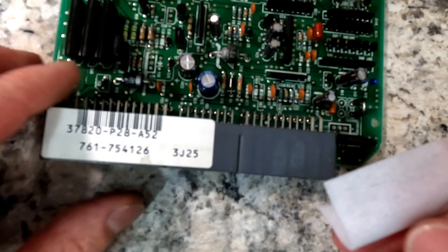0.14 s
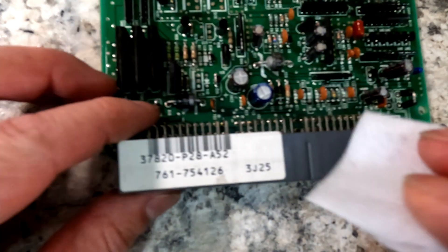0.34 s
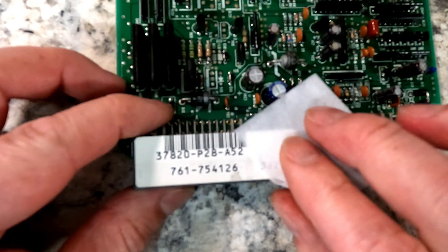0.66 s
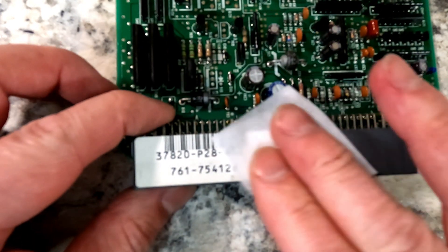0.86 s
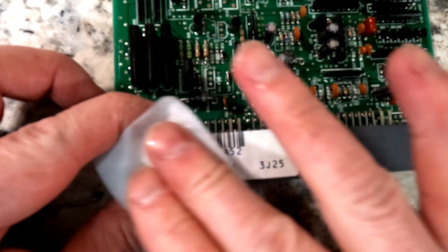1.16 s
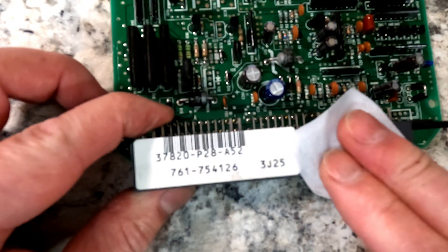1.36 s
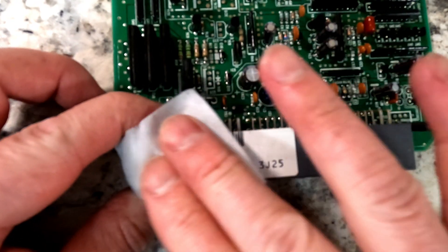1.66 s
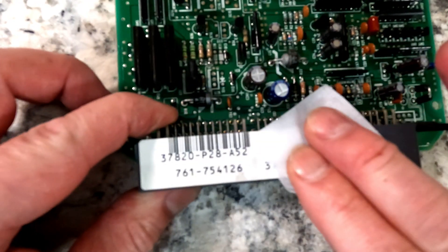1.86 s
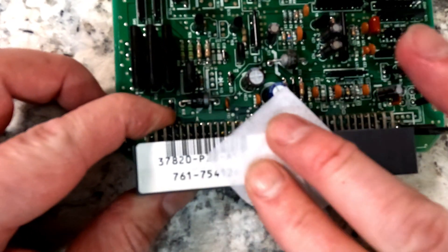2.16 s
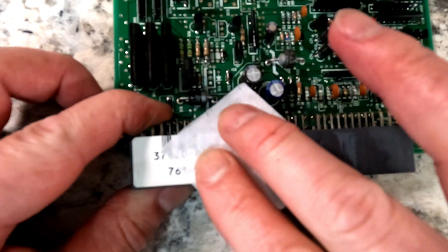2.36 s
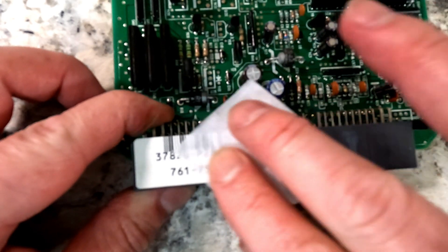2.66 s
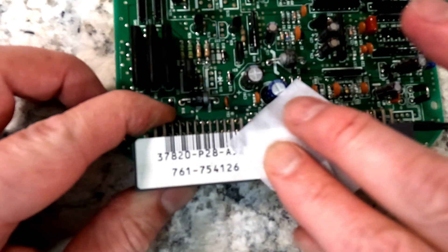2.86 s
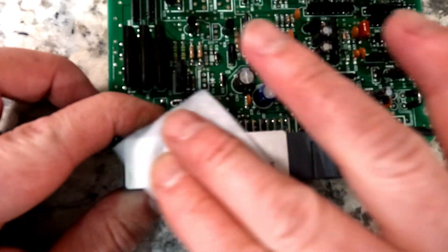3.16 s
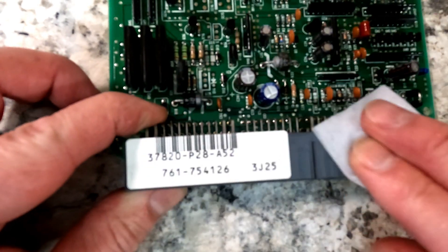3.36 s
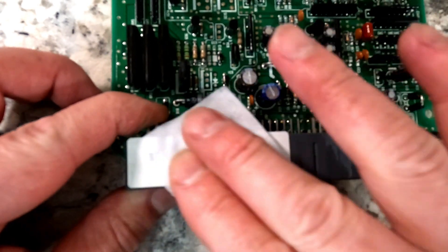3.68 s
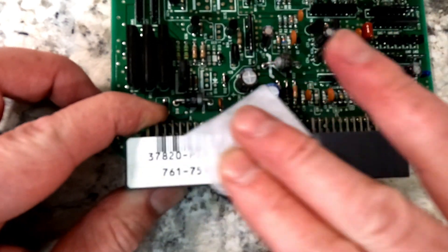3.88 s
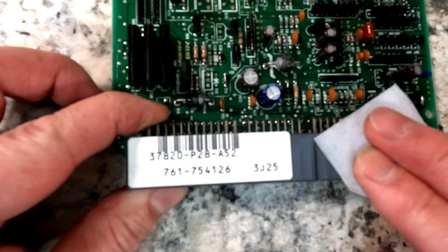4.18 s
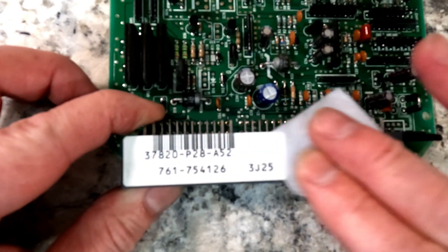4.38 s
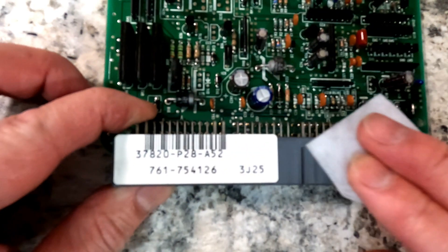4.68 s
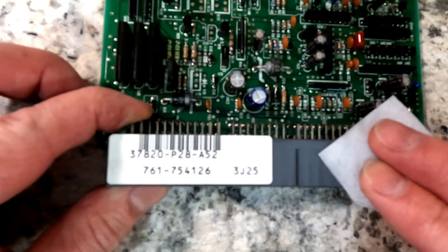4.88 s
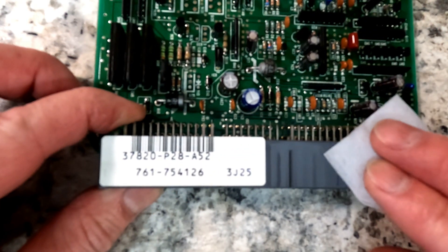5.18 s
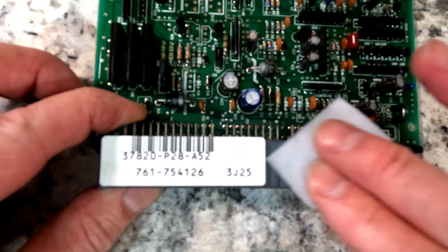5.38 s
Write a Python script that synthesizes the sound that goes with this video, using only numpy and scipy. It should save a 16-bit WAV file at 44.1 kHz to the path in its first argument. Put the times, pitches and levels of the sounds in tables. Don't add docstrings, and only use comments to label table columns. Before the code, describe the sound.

A close, quiet indoor take with faint low room rumble and a thin hiss. From 0 to 1 s fingers settle a cloth pad on a circuit board: a dry crackle near 0.1 s, small skids around 0.5 s, tiny creaks and ticks. From 1 s the pad wipes in short, soft, airy strokes, roughly four a second, each with a slight hollow board hum and light ticks. At 2.55 s the board rocks and drops onto the stone counter: by far the loudest moment, a hard bright clack with a deep thud, repeated more weakly at 2.62 and 2.67 s, rattling out by 2.8 s. Lighter strokes resume about 3 s, with a dull low bump at 3.2 s and faint skin squeaks around 3.6 to 3.7 s. At 4.65 s smaller knocks come, then a low counter heave near 4.86 s. Sparse faint dabs follow, ending with a slight tick about 5.5 s.

```python
import sys
import numpy as np
from scipy import signal
from scipy.fft import rfft, irfft, next_fast_len
from scipy.io import wavfile
from scipy.ndimage import uniform_filter1d

SR = 44100
rng = np.random.default_rng(int(sys.argv[2]) if len(sys.argv) > 2 else 0)


def voltage_ratio(decibels):
    exponent = np.asarray(decibels, float) / 20
    return 10 ** exponent


def to_wav(sig):
    pcm = np.clip(np.atleast_2d(sig), -1, 1) * 32767
    pcm = np.round(pcm).astype(np.int16)
    wavfile.write(sys.argv[1], SR, pcm.T)


N = 243873
OPPOSITE = np.array([[1], [-1]])


def rms_one(x):
    return x / np.sqrt(np.mean(x ** 2) + 1e-20)


def lowpass(x, hz, order=2):
    return signal.sosfilt(signal.butter(order, hz, fs=SR, output="sos"), x)


def bandpass(x, low_hz, high_hz, order=2):
    return signal.sosfilt(signal.butter(order, [low_hz, high_hz], "band", fs=SR, output="sos"), x)


def lean_left(db):
    return voltage_ratio([[db / 2], [-db / 2]])


def in_time(rows):
    s, *columns = np.transpose(rows)
    return [np.interp(np.arange(N) / SR, s, c) for c in columns]


def at_hz(points, hz):
    point_hz, value = np.transpose(points)
    return np.interp(np.log(hz), np.log(point_hz), value)


def drift(rate_hz):
    r = np.exp(-80 * np.pi * rate_hz / SR)
    slow = signal.lfilter([1], [1, -2 * r, r * r], rng.standard_normal(N // 40 + 2002))[2000:]
    return np.interp(np.arange(N) / 40, np.arange(len(slow)), rms_one(slow))


def ring(drive, hz, t60_s):
    r = voltage_ratio(-60 / (max(t60_s, .001) * SR))
    w = 2 * np.pi * hz / SR
    return signal.lfilter([0, np.sin(w)], [1, -2 * r * np.cos(w), r * r], drive + 1e-18)


def grains(spread_db):
    size = voltage_ratio(spread_db * np.minimum(rng.exponential(1, N), 5))
    return rms_one(rng.standard_normal((2, 2, N)) * size)


# (frequency [Hz], left-right likeness [-1..1])
ALIKE = [(30, 0.96), (300, 0.94), (1500, 0.73), (4000, 0.96), (8000, 0.47), (13000, 0.5)]
# (frequency [Hz], left minus right [dB])
LEAN = [(30, 2), (300, 0), (2000, -0.5), (5000, 1), (12000, -2.5)]


def banded(spectrum, patchy_db, white, first=0, last=19, slowing_db=0, bright_db=0):
    out, steady, together = 0, 0, drift(0.86)
    edges = (26 * 2 ** np.arange(0, 9.6, .5))[first:last + 1]
    for k, (low, high) in enumerate(zip(edges, edges[1:])):
        mid, side = bandpass(white[k % 2], low, high)
        hz = np.sqrt(low * high)
        alike = np.clip(at_hz(ALIKE, hz), -1, 1)
        gain = voltage_ratio(at_hz(spectrum, hz) + patchy_db * (together / 2 + drift(11.2)))
        pair = np.sqrt(1 + alike) * mid + np.sqrt(1 - alike) * side * OPPOSITE
        pair = gain * pair * lean_left(at_hz(LEAN, hz))
        steady += np.mean(pair ** 2)
        out = out + pair * voltage_ratio(slowing_db * (hz / 6500) ** 0.36 + bright_db * np.log2(hz / 6500))
    return out / np.sqrt(steady)


def burst(at_s, t60_s, draw):
    fall = voltage_ratio(-60 * np.arange(len(draw)) / SR / np.clip(t60_s, .003, .2))
    return round(at_s * SR), np.r_[1, .3 * (draw * fall)[1:]]


def add(track, start, x):
    track[start:start + len(x)] += x[:N - start]


def slips(swells, resonances):
    t, noise = np.arange(N) / SR, grains(spread_db=2.0)[0, 0]
    swell = sum(voltage_ratio(db) * np.exp(-((t - s) / (length / 2)) ** 2) for s, length, db in swells)
    sung = sum(voltage_ratio(db) * rms_one(ring(noise, hz, 3.25 / width)) for hz, width, db in resonances)
    return swell * lowpass(sung, 6500)


# (frequency [Hz], density [dB per Hz])
ROOM_TONE = [(24, -25), (40, -0.5), (54, -17), (123, -11.5), (245, -10.5), (268, -42), (371, -5),
             (417, -30), (514, -25), (900, -66), (1170, -87.5), (1980, -120)]


def room_tone():
    return voltage_ratio(-50.5) * banded(ROOM_TONE, 0.6, grains(spread_db=0.0), first=1, last=11)


# (frequency [Hz], density [dB per Hz])
AIR = [(470, -58), (800, -21.5), (1070, -13), (1160, 1), (1470, -6.5), (3890, -20), (7500, -22.5),
       (14000, -62)]


def hiss_floor():
    return voltage_ratio(-71.5) * banded(AIR, 0.53, grains(spread_db=-6.0), first=9)


KITCHEN_T60_S, KITCHEN_DB, WALL_CUT_HZ = 0.17, -18.5, 9000


def kitchen(x):
    size = next_fast_len(N + SR)
    angle = -2j * np.pi * np.arange(size // 2 + 1) / size
    pole = np.exp(-2 * np.pi * WALL_CUT_HZ / SR)
    dull = (1 - pole) / (1 - pole * np.exp(angle))
    out = np.zeros((2, len(angle)), complex)
    for k, lag in enumerate(rng.integers(300, 1500, 16)):
        loop = voltage_ratio(-60 * lag / SR / KITCHEN_T60_S) * dull * np.exp(angle * lag)
        out[k % 2] += loop / (1 - loop) * (-1) ** (k // 2)
    return voltage_ratio(KITCHEN_DB) * irfft(out * rfft(x, size), size)[:, :N]


# (time [s], drag on the stone [dB], sway of hands and counter [dB])
HANDS = [(0.0, -48.5, -47), (.15, -52, -41.5), (.45, -63, -44), (.59, -42.5, -53), (.76, -53, -40),
         (1.42, -52.5, -39.5), (1.7, -49, -38), (2.2, -55.5, -39.5), (2.5, -43, -37.5), (2.95, -58, -49.5),
         (3.16, -49.5, -33), (3.55, -56, -50.5), (4.05, -53, -55), (4.25, -53, -37.5), (4.5, -49, -39),
         (4.63, -49.5, -50), (5.12, -49.5, -37.5), (5.53, -53.5, -55)]
# (frequency [Hz], density [dB per Hz])
DRAG = [(29, -30), (50, 4), (76, -17.5), (107, -9), (173, -13), (227, -6.5), (649, -20), (733, -26.5),
        (864, -35.5), (1300, -20), (1690, -47), (2860, -120)]


def handling():
    drag_db, sway_db = in_time(HANDS)
    drag = voltage_ratio(drag_db - 0.5) * banded(DRAG, 2.15, grains(spread_db=2.5), first=2, last=13)
    sway_spectrum = [(30, 16.5), (45, -15.5), (64, -13.5), (90, -24.0)]   # (Hz, dB per Hz)
    sway = voltage_ratio(sway_db - 3.0) * banded(sway_spectrum, 0.8, grains(spread_db=2.0), last=4)
    return drag + sway


# (frequency [Hz], level [dB], t60 [s], left minus right [dB])
COUNTER = [(69, 1, 0.46, -1), (107.6, 12, 0.12, 1), (143.9, -0.5, 0.35, 6), (193, -7, 0.28, 4),
           (219, -16, 0.3, 20.5)]
# (time [s], peak [dB])
THUDS = [
    (2.481, -26),
    (2.55, -5),
    (2.672, -15.5),
    (3.179, -9),
    (3.213, -21),
    (4.849, -9.5),
    (5.089, -38),
]
# (time [s], peak [dB])
REBOUNDS = [
    (4.871, -10.5),
    (4.885, -12),
]
# (time [s], level [dB], t60 [s])
SWAYS = [
    (2.556, -42, 0.25),
    (3.199, -32, 0.14),
    (3.23, -16.5, 0.28),
    (4.863, -18, 0.69),
]
SWAY_HZ, SWAY_LEFT_DB, SLAB_LAG_S = 23.24, 7.5, .003


def thuds():
    push, sway = np.zeros((2, N))
    for s, db in THUDS:
        push[round((s + SLAB_LAG_S) * SR)] = voltage_ratio(db - 18.0)
    for s, db in REBOUNDS:
        push[round((s + SLAB_LAG_S) * SR)] = -voltage_ratio(db - 21.5)
    for s, db, t60 in SWAYS:
        add(sway, round(s * SR), -voltage_ratio(db) * ring(np.arange(SR) == 0, SWAY_HZ, t60))
    out = sway * lean_left(SWAY_LEFT_DB)
    for hz, db, t60, left_db in COUNTER:
        out = out - voltage_ratio(db) * ring(push, hz, t60) * lean_left(left_db)
    return lowpass(out, 300, order=3)


# (time [s], length [s], level [dB])
SCRAPES = [
    (.45, 0.046, -38.5),
    (.482, 0.046, -31),
    (.54, 0.051, -40.5),
    (.77, 0.048, -72),
    (1.06, 0.05, -46.5),
    (2.138, 0.065, -42),
    (2.74, 0.19, -41),
    (3.49, 0.035, -43.5),
    (4.86, 0.036, -38),
    (4.93, 0.058, -45),
]
# (frequency [Hz], width [Hz], level [dB])
SCRAPE = [(300, 65, -1.5), (727, 88, -9.5), (1050, 360, -14.5), (1450, 230, -13), (1900, 570, -20),
          (2740, 2100, -14)]


def scrapes():
    return slips(SCRAPES, SCRAPE)


# (time [s], length [s], level [dB])
SQUEAKS = [
    (3.586, 0.044, -55),
    (3.73, 0.039, -47.5),
    (4.124, 0.032, -83),
    (5.138, 0.04, -62),
]
# (frequency [Hz], width [Hz], level [dB])
SQUEAK = [(768, 110, 7), (2980, 150, -1), (5840, 100, 0)]


def squeaks():
    return slips(SQUEAKS, SQUEAK)


# (time [s], length [s], level [dB], frequency [Hz], width [Hz])
CREAKS = [(.406, 0.013, -70, 1450, 300), (.537, 0.011, -47.5, 3650, 400), (0.586, 0.046, -49.5, 1550, 150),
          (0.637, 0.058, -56, 1560, 149), (.69, 0.05, -59, 2980, 119), (0.723, 0.063, -50, 1510, 130),
          (.782, 0.03, -49.5, 1450, 150), (0.819, .02, -52, 1450, 150), (0.88, 0.009, -56, 3700, 300),
          (0.919, 0.022, -49, 1450, 128), (0.923, 0.014, -58, 3700, 300), (.58, 0.16, -46.5, 304, 150),
          (2.128, 0.11, -48, 517, 201), (2.135, 0.072, -51, 925, 150), (2.677, 0.046, -30, 900, 152),
          (2.783, 0.079, -40.5, 450, 59.7), (2.86, 0.08, -46, 199, 39.3), (3.186, 0.023, -49.5, 960, 200),
          (3.485, 0.045, -47.5, 430, 80.7), (4.777, 0.082, -49.5, 1384, 58.5),
          (4.853, 0.014, -42.5, 960, 200), (4.913, 0.018, -50, 1020, 120), (4.918, 0.021, -56, 810, 120),
          (4.959, 0.094, -51, 840, 100), (5.204, 0.063, -57.5, 1554, 101), (0.448, 0.02, -35, 310, 80),
          (0.474, 0.096, -49, 726, 80), (0.799, 0.064, -44.5, 108, 40), (1.11, 0.043, -41.5, 107, 40),
          (4.456, 0.09, -50.5, 116, 40), (4.192, 0.033, -55.5, 5580, 100), (4.829, 0.035, -52.5, 5800, 250),
          (5.343, 0.028, -60.5, 5630, 120.6), (5.327, 0.28, -61.5, 1410, 80), (4.66, 0.011, -34, 2000, 900),
          (4.704, 0.036, -38, 1950, 900), (4.742, 0.03, -43, 1600, 300)]


def creaks():
    out, t = np.zeros(N), np.arange(-4000, 4000) / SR
    for (s, length, db, hz, width), draw in zip(CREAKS, rng.standard_normal((len(CREAKS), len(t)))):
        sung = rms_one(ring(ring(draw, hz, 1.9 / width), hz, 1.9 / width))
        add(out, round((s + t[0]) * SR), voltage_ratio(db) * np.exp(-(2 * t / length) ** 2) * sung)
    return out * lean_left(1.0)


# (time [s], peak [dB], low edge [Hz])
PRICKS = [(0.0782, -24, 2500), (0.0855, -44, 1200), (0.114, -50, 5000), (0.1335, -41, 3500),
          (0.778, -46, 6000), (0.915, -55, 7000), (1.6112, -46, 1200), (2.1056, -42, 900),
          (2.5508, -18, 3500), (2.6238, -28, 3000), (2.6724, -20, 4500), (2.682, -28, 3960),
          (2.7152, -37, 1500), (2.7497, -42, 1300), (2.7858, -52, 1310), (3.4702, -43, 900),
          (4.7352, -30, 3500), (4.7368, -40, 5000), (5.02, -48.5, 4000), (5.513, -46, 1500)]
PRICK_T60_S, PRICK_TOP_HZ = 0.0045, 14000


def pricks():
    out = np.zeros(N)
    for (s, db, low_hz), draw in zip(PRICKS, rng.standard_normal((len(PRICKS), 400))):
        start, force = burst(s, PRICK_T60_S, draw)
        add(out, start, voltage_ratio(db) * bandpass(force, low_hz, PRICK_TOP_HZ))
    return out


# (time [s], peak [dB], frequency [Hz], brightness above peak [dB])
SNAPS = [(0.0782, -24, 4300, -29), (0.089, -31, 4300, -15), (0.11, -60, 1200, -19), (0.131, -39, 3740, -18),
         (0.271, -59, 6000, -15), (0.758, -46, 10100, -8), (0.777, -52, 1450, -12), (0.915, -70, 3760, -10),
         (0.8173, -58, 1480, -23), (3.181, -40, 1750, -25), (4.7273, -24, 1500, -30),
         (4.7352, -27.5, 5000, -7), (4.8537, -37, 915, -28), (5.02, -49, 1420, -12),
         (4.393, -49, 5030, -13.5), (5.147, -38, 4700, -12)]


def snaps():
    out = np.zeros(N)
    for (s, db, hz, bright_db), draw in zip(SNAPS, rng.standard_normal((len(SNAPS), 900))):
        start, force = burst(s, 0.018, draw)
        edge = voltage_ratio(bright_db - 16.0) * np.diff(force, prepend=0)
        add(out, start, voltage_ratio(db - 4.5) * (ring(force, hz, 4.7 / hz) + edge))
    return out


# (time [s], peak [dB], frequency [Hz], length [cycles])
BOUNCES = [(2.5501, -1.5, 1450, 4.5), (2.5509, 2, 2950, 10), (2.5554, 2, 3000, 9.6),
           (2.5598, -8, 3100, 6.0), (2.5635, -3, 2860, 6.5), (2.598, -18, 1500, 9.9),
           (2.623, -5.5, 1420, 7), (2.6243, -11, 2980, 7.1), (2.677, -8.5, 1520, 9.7),
           (2.6832, -7, 2930, 11), (2.691, -23, 3720, 8.3), (2.716, -16, 2690, 5.3),
           (2.721, -15, 1800, 9.3), (2.7517, -12, 1900, 3.7), (4.6532, -11.5, 2570, 5.8),
           (4.693, -17, 2500, 4.3), (4.703, -14, 2500, 3.0), (4.71, -36, 2700, 5.0),
           (4.7278, -25, 1450, 32), (4.7315, -29, 1450, 18.0), (0.0783, -48, 3500, 3.0),
           (3.182, -40, 1840, 62), (3.473, -31, 1540, 30.0), (4.66, -22, 1800, 5.0),
           (4.664, -25, 2600, 4.0), (4.6975, -31, 1800, 5.0), (4.7155, -39, 2500, 3.0),
           (2.5673, -16, 1500, 8.0), (2.572, -21, 1600, 8.0), (2.629, -16, 1500, 8.0),
           (2.637, -17, 2000, 6.0), (2.688, -24, 1530, 9.0), (1.611, -42, 1500, 6.0),
           (2.474, -35, 1100, 8.1)]


def bounces():
    out = np.zeros(N)
    for s, db, hz, cycles in BOUNCES:
        add(out, round(s * SR), -voltage_ratio(db) * ring(np.arange(2000) == 0, hz, cycles / hz))
    return bandpass(out, 1000, 4200, order=4)


# (time [s], peak [dB], flap above peak [dB], hardness above peak [dB], rattle t60 [s])
DROPS = [(2.1056, -30, -1, -34, 0.044), (2.1246, -33.5, -21, -21, 0.046), (2.5507, -2, -9, 0.5, 0.044),
         (2.5554, -20, -17, -24, 0.066), (2.5618, -25.5, 5, -29.5, 0.029), (2.6229, -11, -11, 0, 0.13),
         (2.6728, -10, -13.5, -2, 0.11), (2.683, -16, -10, -18, 0.1), (2.7152, -23, -6.5, -10, 0.21),
         (2.7495, -23.5, 0, -28, 0.046), (2.7855, -33, -4, -33, 0.05), (3.4698, -33.5, -8.5, -28.5, 0.1),
         (4.6533, -27, -0.5, -30, 0.17), (4.6922, -29, 1, -26, 0.08), (4.7037, -37, 7, -34, 0.12),
         (4.7285, -43.5, 9, -34, 0.2)]
# (time [s], peak [dB])
TICKS = [(0.4, -48.5), (0.5342, -40), (0.877, -47.5), (0.9815, -46.5), (1.0446, -40.5), (1.6122, -43.5),
         (2.29, -43.5), (2.475, -53), (2.9666, -52), (3.059, -45.5), (4.145, -39), (4.2472, -42.5),
         (5.489, -60), (5.513, -37.5)]
# (frequency [Hz], level [dB], t60 [s])
CLACK = [(1557, 7.5, 0.018), (2540, -1, 0.013), (2830, 0.5, 0.012)]
# (frequency [Hz], level [dB], t60 [s])
FLAP = [(120.7, -9.5, 0.11), (179.2, -2.5, 0.12), (214.4, -5.5, 0.19), (250, -10.5, 0.06), (303, -8, 0.12),
        (361, -12, 0.12), (426, -13, 0.069)]
# (frequency [Hz], level knocked [dB], level rubbed [dB], t60 [s])
BOARD = [(756, -10.5, -11.5, 0.14), (876, -12.5, -38, 0.059), (1427, 2.5, 0.5, 0.07), (1596, 0, -9, 0.046),
         (1800, -7, -6, 0.11), (2260, -13, -26.5, 0.042), (2600, 0.5, 0.5, 0.013),
         (2676, -15.5, -5.5, 0.027), (2930, -32.5, -4.5, 0.043), (3240, -7, -9.5, 0.021),
         (3800, -34.5, -0.5, 0.0081), (3860, 0.5, -12, 0.015), (4540, -49, 12.5, 0.013),
         (5325, -2, 16, 0.026), (6560, -39.5, 1.5, 0.03)]
TICK_FLAP_DB, TICK_HARD_DB, TICK_T60_S = -2.5, -8.5, 0.11
RATTLE_T60_S = 0.079
FLAP_CHATTER = 0.26
SPLINTER_DB, SPLINTER_SAMPLES = 2.5, 60
CHATTER_SAMPLES = 4000


def knocks():
    first, sharp, shaken, soft, left, right = np.zeros((6, N))
    contacts = sorted(DROPS + [(s, db, TICK_FLAP_DB, TICK_HARD_DB, TICK_T60_S) for s, db in TICKS])
    chatter = rng.standard_normal((len(contacts), 2, CHATTER_SAMPLES))
    splinters = rng.standard_normal((len(contacts), 1, CHATTER_SAMPLES // SPLINTER_SAMPLES + 1))
    splinters = splinters.repeat(SPLINTER_SAMPLES, axis=2)[..., :CHATTER_SAMPLES]
    chatter = chatter * voltage_ratio(SPLINTER_DB * splinters - SPLINTER_DB ** 2 * np.log(10) / 20)
    for (s, db, flap_db, hard_db, t60), draw in zip(contacts, chatter):
        start, force = burst(s, t60, draw[0])
        first[start] = voltage_ratio(db)
        add(shaken, start, burst(s, t60 + RATTLE_T60_S, draw[1])[1] * voltage_ratio(db))
        add(sharp, start, force * voltage_ratio(db))
        add(soft, start, burst(s, t60, FLAP_CHATTER * draw[0])[1] * voltage_ratio(db + flap_db - 1.0))
        add(left, start, force * voltage_ratio(db + hard_db - 4.0))
        add(right, start, burst(s, t60, 0.12 * draw[0] + 0.17 * draw[1])[1] * voltage_ratio(db + hard_db + 6.5))
    dent = 0.84 * first + 0.28 * sharp
    clack = sum(voltage_ratio(db - 9.0) * ring(dent, hz, t60) * (-1) ** k for k, (hz, db, t60) in enumerate(CLACK))
    rattle = bandpass(shaken, 1200, 3740, order=3)
    rings = sum(voltage_ratio(db - 23.0) * ring(sharp, hz, 0.67 * t60) * (-1) ** k
                for k, (hz, db, _, t60) in enumerate(BOARD))
    flaps = -sum(voltage_ratio(db) * ring(soft, hz, t60) for hz, db, t60 in FLAP)
    flaps = bandpass(flaps, 90, 520)
    crack = bandpass([left, right], 4400, 7500)
    body = lowpass(clack + voltage_ratio(5.0) * rattle + rings, 5000)
    sizzle = bandpass(shaken, 3700, 8000)
    return body + flaps + voltage_ratio(-17.5) * sizzle, crack


# (start [s], length [s], hiss [dB], swell
# start to end [dB], board hum above hiss [dB])
STROKES = [(1.008, 0.15, -56.5, 11, 5.5), (1.114, 0.16, -55, 6, 2.5), (1.355, 0.21, -55, -3, 8),
           (1.627, 0.2, -56, 0, 7.5), (1.876, 0.16, -55, 1, 3), (2.123, 0.11, -55, 3.5, 7.5),
           (2.314, 0.083, -55.5, -3.5, 9.5), (2.479, 0.12, -54.5, 0, 0), (2.542, 0.37, -56, -18.5, 9.5),
           (2.959, 0.084, -60, -1, -1), (3.101, 0.15, -60, 7.5, -2), (3.334, .2, -59, -3, 4),
           (3.504, 0.12, -60, -13, 9.5), (3.665, 0.089, -63, 13, 11), (3.77, 0.18, -58, -12.5, 6),
           (4.006, 0.16, -58, 4, 1), (4.173, 0.14, -59.5, -6, 8.5), (4.467, 0.17, -60.5, 9.5, 8),
           (4.589, 0.056, -56.5, -7.5, 5.5), (4.651, 0.065, -62, -14, 13.5), (4.74, 0.24, -58.5, -1, 10.5),
           (0.0, 0.071, -60, -25, 11), (0.068, 0.099, -65.5, -17, 1.5), (0.275, 0.022, -72.5, 0, 0),
        (0.395, 0.018, -64, -1, 7), (0.43, 0.052, -65, 8, 10), (0.489, 0.25, -70, 4.5, 15),
        (0.75, 0.034, -62.5, 10, -1), (0.82, 0.028, -62, -6, 7.5), (0.888, 0.035, -68.5, 7, 16),
        (5.02, .016, -64, -14, 12), (5.04, 0.085, -68, 4, 12), (5.139, 0.086, -71.5, -10, 15.5),
        (5.339, 0.052, -67.5, -1.5, 12.5), (5.492, 0.044, -58.5, 9, 10.5), (1.28, .07, -71, -9, 15.5),
        (1.57, .05, -70, -8, 7), (2.047, 0.048, -69.5, -15, 14.5), (3.254, .06, -69.5, -4, 15)]
START_DB_PER_S, STOP_DB_PER_S, REST_DB = 1302, 793, -78
HUM_FOLLOWS = 0.55
DULL_PER_PRESS_DB, BRIGHT_DB = 0.3192, 1.04
FULL_SPEED_DB = -54.5


def strokes():
    t, rows = np.arange(0, N / SR, .001), np.array(STROKES)
    s, length, db, swell_db, press_db = rows.T[:, :, None]
    held_db = db + swell_db * (np.clip((t - s) / length, 0, 1) - .5)
    lost_db = np.maximum(0, np.maximum(START_DB_PER_S * (s - t), STOP_DB_PER_S * (t - s - length)))
    lead = np.argmax(held_db - lost_db, axis=0)
    bright_db = uniform_filter1d(BRIGHT_DB - DULL_PER_PRESS_DB * press_db[lead, 0], size=14)
    hum_db = np.max(held_db + press_db - HUM_FOLLOWS * lost_db, axis=0)
    hiss_db = np.maximum(np.max(held_db - lost_db, axis=0), REST_DB)
    return in_time(np.c_[t, hiss_db, hum_db, bright_db])


# (frequency [Hz], width [Hz], level [dB])
WEAVE = [(2730, 110, 0.5), (3226, 69, -2.5), (3650, 290, -4), (4580, 68, -5), (4970, 100, -4),
         (5970, 140, -7), (6460, 98, -20.5), (7280, 80, -11), (8130, 49, -31), (8860, 140, -9.5),
         (9500, 250, -25.5), (11700, 41, -74.5), (12000, 120, -43), (12700, 110, -33.5)]
WEAVE_DB, WEAVE_WANDER_DB = -62, 3.0


def weave():
    rub = rng.standard_normal((2, N))
    rub = rub[0] + 0.13 * rub[1] * OPPOSITE
    sung = sum(voltage_ratio(db + WEAVE_WANDER_DB * drift(4.1)) * rms_one(ring(rub, hz, 2.5 / width))
               for hz, width, db in WEAVE)
    return voltage_ratio(WEAVE_DB + 1.7 * (strokes()[0] - FULL_SPEED_DB)) * sung


def off_counter(x):
    late = np.arange(N) - SR * 0.001079 * voltage_ratio(1.7 * drift(2.0))
    return x + 0.3 * np.array([np.interp(late, np.arange(N), c) for c in x])


# (frequency [Hz], density [dB per Hz])
HISS = [(290, -36), (500, -3.5), (737, -15), (876, -12.5), (1030, -8), (1390, -6), (1990, -7), (2810, -3),
        (4200, -12.5), (5060, -7.5), (10500, -13), (13300, -5), (15500, -23)]
# (frequency [Hz], width [Hz], level [dB])
PAD = [(5000, 96, -23), (5440, 310, -22), (5390, 220, -4.5), (5890, 340, -3.5), (6610, 1200, 2),
       (9800, 270, -9)]
MODE_WANDER_DB, UNEVEN_DB = 2.5, 1.2


def wiping():
    hiss_db, hum_db, bright_db = strokes()
    slowing_db, rub = hiss_db - FULL_SPEED_DB, grains(spread_db=1.0)
    folds = sum(voltage_ratio(db + 4.0 * drift(4.0)) * rms_one(ring(rub[1, 0], hz, 2.2 / width)) for hz, width, db in PAD)
    hiss = banded(HISS, 3.2, grains(spread_db=4.0), first=8, slowing_db=slowing_db, bright_db=bright_db)
    hiss = off_counter(hiss) + voltage_ratio(slowing_db - 11) * folds
    hum = sum(voltage_ratio(db + MODE_WANDER_DB * drift(6.1)) * rms_one(ring(rub[0, 0], hz, 0.46 * t60)) * (-1) ** k
              for k, (hz, _, db, t60) in enumerate(BOARD[:12]))
    return voltage_ratio(-53.0 + UNEVEN_DB * drift(25.0)) * hiss, voltage_ratio(hum_db - 4) * rms_one(hum)


def scene():
    (hiss, hum), (knock, crack) = wiping(), knocks()
    board = hum + knock + squeaks() + scrapes() + snaps() + bounces()
    near = board * lean_left(1.2) + thuds() + crack
    room = room_tone() + hiss_floor() + kitchen(board + crack[0])
    return room + near + hiss + handling() + creaks() + weave() + pricks()


def low_pass(x):
    return signal.sosfilt(signal.butter(12, 15670, fs=SR, output="sos"), x)


PORT_LAG_RAD, PORT_HZ, MIC_TOP_HZ = 2.37, 12600, 13650


def record(dry):
    hz = np.arange(N // 2 + 1) * SR / N
    lag = np.exp(-1j * PORT_LAG_RAD * np.minimum(hz / PORT_HZ, 1) ** 2.5)
    ports = np.array([irfft(rfft(dry[0]) * lag, N), dry[1]])
    ports = lowpass(ports, MIC_TOP_HZ, order=4)
    ports = signal.sosfilt(signal.cheby2(12, 50, 15800, fs=SR, output="sos"), ports)
    mix = 0.97 * np.tanh(ports / 1.213)
    return low_pass(mix)


dry = scene()
out = record(dry)
to_wav(out)
```